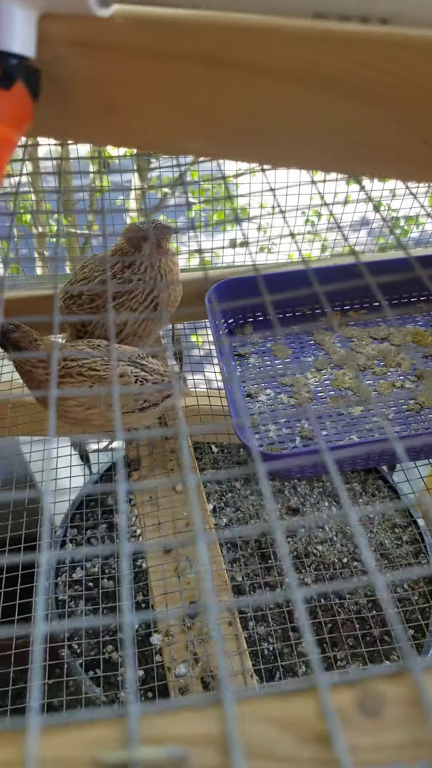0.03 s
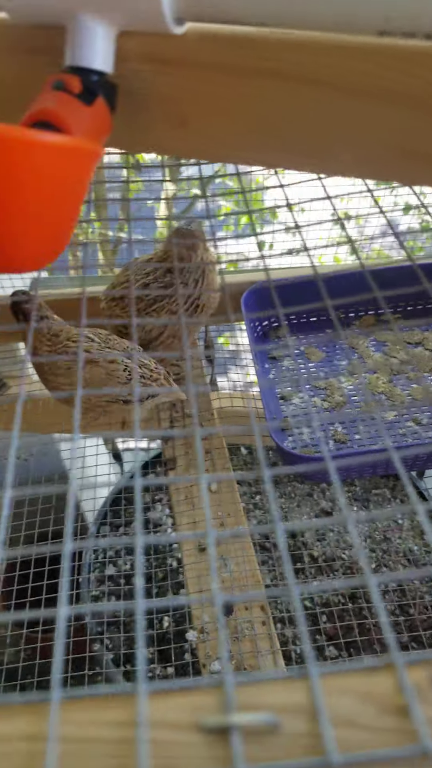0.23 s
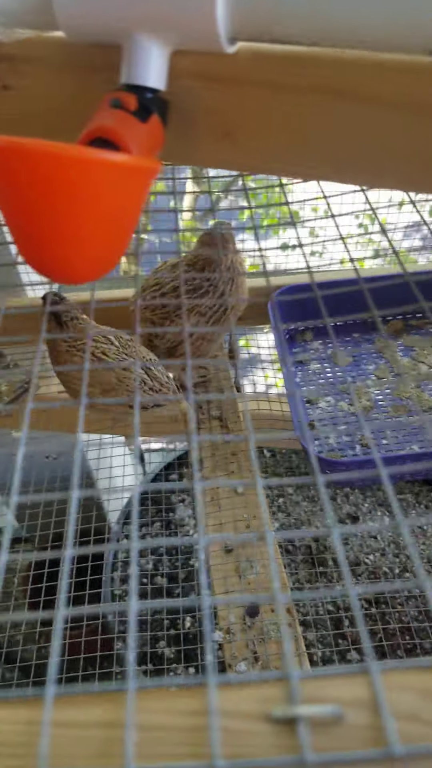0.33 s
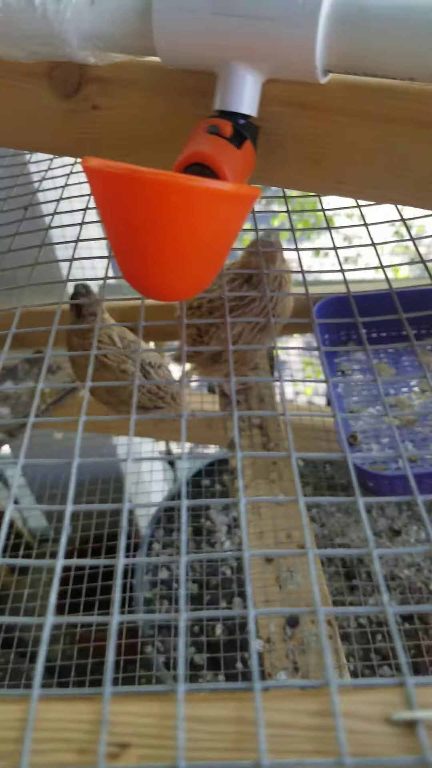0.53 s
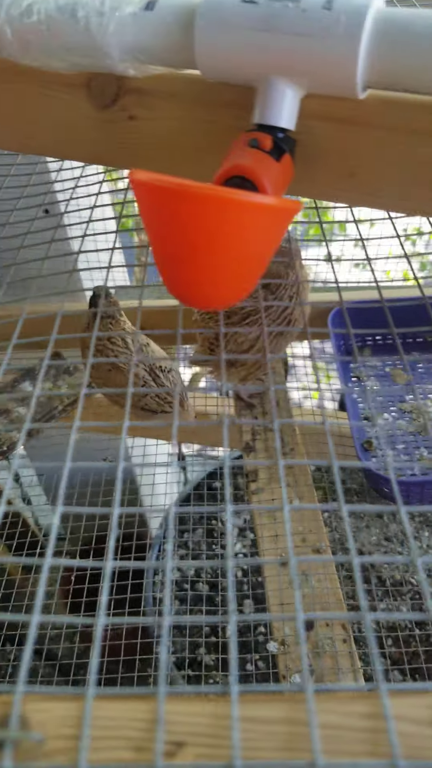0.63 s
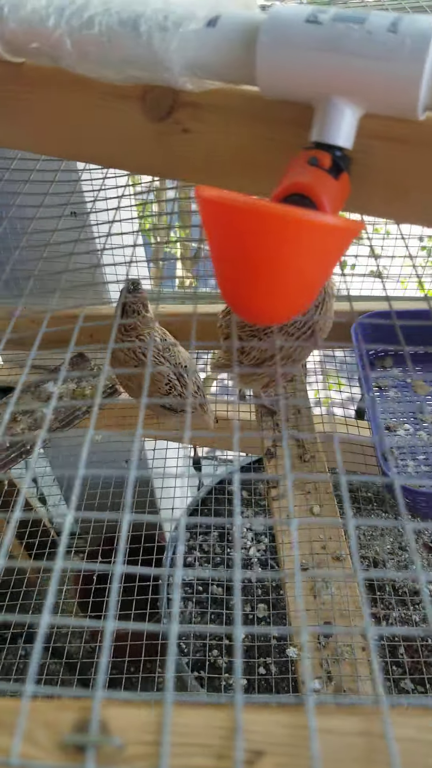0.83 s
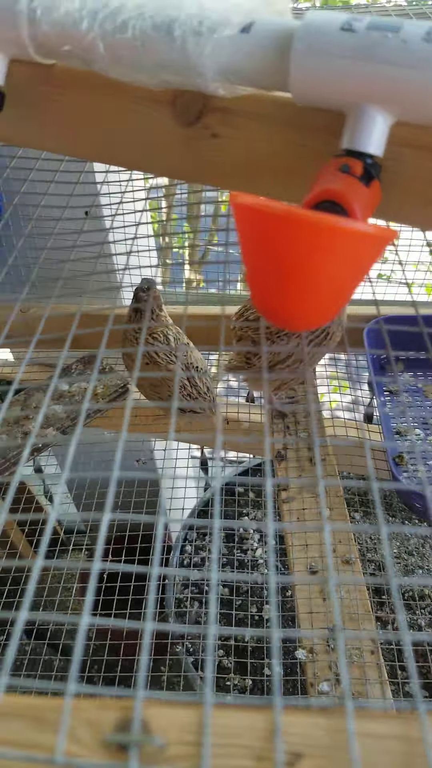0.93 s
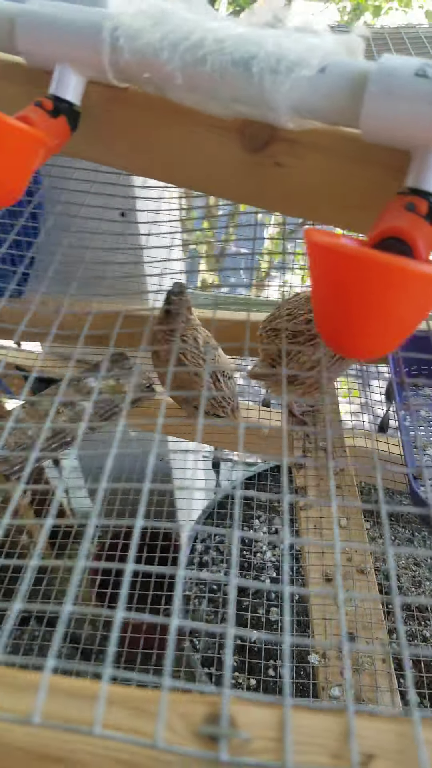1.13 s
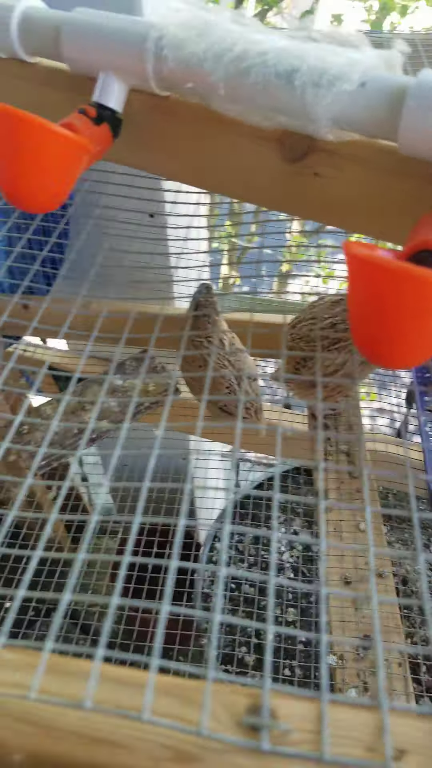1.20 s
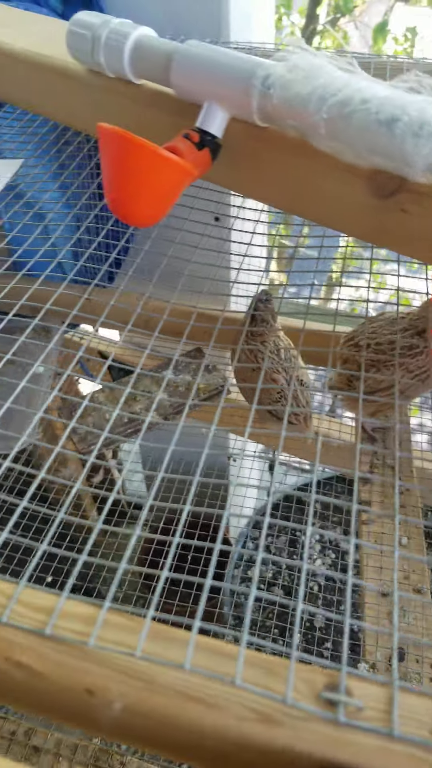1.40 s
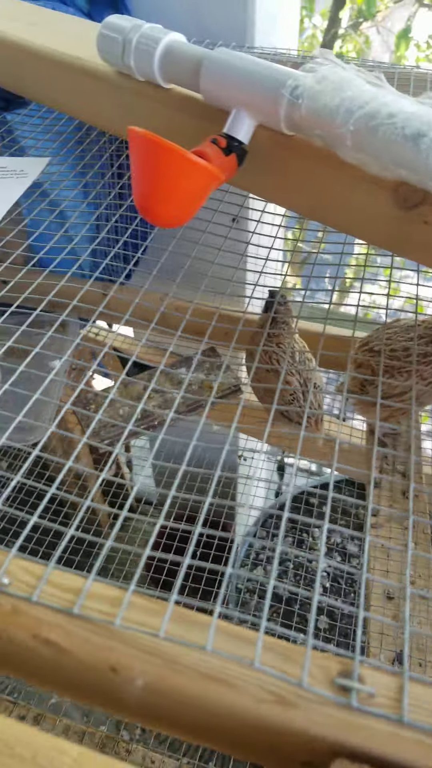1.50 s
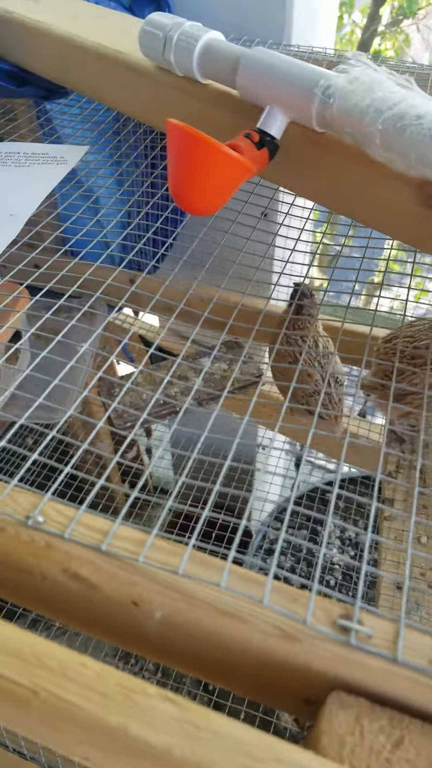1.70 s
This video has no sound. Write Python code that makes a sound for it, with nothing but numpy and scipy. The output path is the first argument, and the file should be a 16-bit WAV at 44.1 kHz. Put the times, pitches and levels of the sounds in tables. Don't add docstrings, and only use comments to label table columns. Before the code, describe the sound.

A caged quail gives one loud, harsh, raspy trilled crow very close, then faint claw ticks

```python
import sys
import numpy as np
from scipy import signal
from scipy.fft import rfft, irfft, next_fast_len
from scipy.io import wavfile
from scipy.ndimage import uniform_filter1d, minimum_filter1d, map_coordinates

SR = 44100
rng = np.random.default_rng(int(sys.argv[2]) if len(sys.argv) > 2 else 0)


def convert_level_to_amplitude(level_db):
    exponent = np.asarray(level_db, float) / 20
    return 10 ** exponent


def store_wav(level_fs):
    pcm = np.round(np.clip(np.atleast_2d(level_fs), -1, 1) * 32767)
    wavfile.write(sys.argv[1], SR, pcm.T.astype(np.int16))


N = 77175
T = np.arange(N) / SR

# [f/Hz, width/Hz, level/dB]
INSECTS = [(1550, 350, -66), (2900, 310, -57.5), (6650, 500, -61), (8600, 680, -62), (12000, 1400, -60.5)]
INSECTS_END_S, INSECTS_FADE_DB_PER_S = 0.65, 20
# [t/s, traffic level/dB, flock level/dB]
AROUND = [
    [(0.0, -42, -53.5), (0.082, -50, -60.5), (0.12, -51.5, -54)],
    [(0.62, -56.5, -61), (1.01, -59.5, -73.5), (1.75, -52.5, -57)],
]
# [f/Hz, level/dB]
TRAFFIC = [(15, -51.5), (25, -26.5), (92, 4.5), (114, -8.5), (173, -4.5), (202, -10), (491, -12.5),
           (603, -19.5), (1100, -30.5), (1430, -55.5), (2420, -120)]
# [f/Hz, level/dB]
FLOCK = [(410, -24.5), (700, -10), (1200, -8), (1600, -1.5), (2100, -10.5), (2720, -9), (3330, -12),
         (4490, -11.5), (7000, -28), (9100, -56), (15400, -120)]
FLOCK_PATCH_DB = .8
# [f/Hz, level/dB]
SHUFFLE = [(500, 2), (1000, -6), (3000, -9), (4500, 0), (5500, -6), (12000, -19)]
SHUFFLE_S, SHUFFLE_DB = 1.69, -60
# [f/Hz, level/dB]
LEAVES = [(5000, -6), (8000, -5), (13000, -6), (16000, -10)]
LEAVES_DB = -76.5
# [from t/s, to t/s, level/dB]
LULL = (0.86, 1.14, -2)
# [from t/s, to t/s, level/dB]
GUST = (1.283, 1.4, -71)
# [f/Hz, correlation]
ALIKE = [(100, .99), (300, .94), (640, .6), (1400, .2), (3000, 0)]
# [from t/s, to t/s, f/Hz, end f/Hz, level/dB]
MURMURS = [(1.002, 1.216, 1680, 1910, -73), (1.098, 1.3, 1380, 1450, -73), (1.279, 1.75, 1480, 1420, -70),
           (1.42, 1.751, 1754, 1716, -67), (1.46, 1.75, 2750, 2696, -74.5), (0.838, .96, 4830, 4730, -75)]

# [t/s, level/dB, f/Hz, L-R level/dB]
TICKS = [
    (1.0857, -43, 11820, -22),
    (1.1095, -42, 12000, -17),
    (1.1681, -56, 15340, -9.5),
    (1.1772, -57, 12000, -13),
    (1.2142, -45, 10200, -14.5),
]
# [t/s, level/dB, f/Hz, L-R level/dB]
TAPS = [
    (1.2444, -62, 1648, -2),
    (1.286, -55, 1487, 1),
    (1.3531, -51, 1846, -8.5),
    (1.4778, -53.5, 2686, 1),
    (1.5959, -48, 1477, 1.5),
]
TOUCH_S = .0001

# [peak t/s, level/dB, swell/s, f/Hz]
WHISTLES = [(0.134, -11, .003, 1826), (0.141, -6.5, 0.0071, 1840), (0.15, -1, 0.0022, 1863),
            (.180, -2, 0.0031, 1830), (0.2152, -6.5, 0.0051, 1964), (0.2253, -1, 0.0034, 1840),
            (0.2726, 0, .004, 1850), (0.3152, -4, 0.0058, 1874), (0.3229, -1, 0.0028, 1879),
            (.365, -14, 0.0066, 1980), (0.371, -2, 0.0053, 1843), (0.3782, -3.5, 0.00082, 1996),
            (0.409, -11, 0.004, 1797), (0.418, -7.5, 0.0031, 1870), (.425, -1.5, 0.007, 1904),
            (.438, -16, .004, 1997), (0.444, -15, 0.00067, 1934), (0.468, -17, 0.0041, 1860)]
START_S, START_HZ, START_GLIDE_S, END_S = .131, 1186, .019, 0.595
ONSET_S, FADE_SHARE, DROOP_HZ = .0025, 0.31, 106

# [break t/s, length/s, level/dB, top of arch f/Hz]
RASPS = [
    (.153, 0.02, -13, 3714),
    (.197, 0.014, -11.5, 4053),
    (.240, 0.025, -12, 3848),
    (.286, .027, -15, 4110),
    (.333, .031, -17.5, 3710),
    (.380, .033, -20, 3475),
    (.428, 0.042, -21, 3280),
    (.479, 0.086, -22, 3100),
]
SLIDE_S, SLIDE_DB, SLIDE_HZ = 0.0011, 3.8, 2377
ARCH_SHARE, ARCH_DB, HOLD_DB = .74, -10, -21.5
RASP_RISE_S, RASP_FALL_S, RASP_SAG_DB, LAST_SAG_DB = 0.0015, 0.003, 3, 17
STEADY, FLUTTER_HZ, SCATTER_HZ = .35, 36.9, 254.4
OCTAVE_DB, FIFTH_HZ, FIFTH_DB = -38, 5397, -19
UNDER_HZ, UNDER_SINKS_HZ, UNDER_DB, UNDER_LEAD_S = 1394, 1197, -18, 0.0033
LUMP_DB, SUNK_SHARE = 3.5, .12

# [t/s, half length/s, level/dB, f/Hz, glide/(Hz per ms)]
SQUEAKS = [(.140, 0.0065, -30.5, 928, 7.5), (.158, 0.0011, -5, 3600, 0.5),
           (.166, 0.0057, -14.5, 3154, -14.5), (.1975, 0.0017, -10.5, 2423, 20.5),
           (.203, 0.0093, -19.5, 2750, 10.5), (.205, 0.0026, -14, 4068, 0), (.219, 0.0023, -26.5, 3896, -9),
           (.240, 0.0012, -12, 2516, 22.5), (.243, 0.0015, -12.5, 2935, 19.5),
           (.249, 0.0036, -23.5, 2490, -38.5), (.249, .004, -23, 4188, -4.5),
           (.259, .004, -10.5, 3200, -60), (.265, 0.0016, -23.5, 3256, -27.5), (.287, .002, -14, 2400, 31),
           (.293, .004, -17, 4103, 1.5), (.298, .004, -23, 2450, 4.5), (.308, 0.0041, -15, 3064, 79),
           (.334, 0.0029, -12.5, 2298, 35.5), (.345, 0.005, -23, 4038, -1), (.354, 0.0035, -14, 3085, -63),
           (.381, 0.0015, -13.5, 2306, 50), (.386, 0.0014, -19.5, 3570, 19),
           (.401, 0.013, -24, 3232, -31.5), (.430, 0.0029, -20.5, 2328, 47.5),
           (.450, .0015, -22.5, 2246, -5.5), (.466, 0.006, -18.5, 2407, 7), (.483, 0.0016, -12.5, 2710, 17),
           (.483, .002, -32, 4730, -6.5),
           (.159, 0.0013, -19, 1830, 6), (.164, .0015, -17, 1880, 7), (.171, .002, -17.5, 1750, -10.5),
         (.191, 0.0024, -20, 1470, -20), (.192, 0.0023, -22, 1910, 3), (.206, .002, -18, 1810, 1),
         (.235, .003, -24.5, 1400, -5.5), (.247, 0.0012, -20.5, 1861, -30), (0.257, 0.0018, -18, 1791, -54),
         (0.264, .0015, -19, 1827, -31), (.341, .002, -21.5, 1950, 5.5), (.357, 0.0058, -17, 1520, 2),
         (.391, .003, -20.5, 1940, 4.5), (0.546, 0.01, -37.5, 1194, -2.5)]
SQUEAK_LIFT_DB, SQUEAK_OCTAVE_DB = 2, -28

# [f/Hz, level/dB]
THROAT = [(700, -34), (1830, 1), (2750, -7.5), (3300, -13), (4050, -14), (7000, -28.5), (9000, -33.5),
          (15700, -32.5)]
# [f/Hz, level/dB]
SLACK = [(290, -67.5), (500, -33.5), (1190, -2), (2080, -5), (3170, -2.5), (6800, -29), (9080, -45.5),
         (10600, -33), (15700, -36.5)]
LEAK_DB, PULSE_HZ, PULSE_DB, APART_HZ = -11, 1580, 2, 6000

# [delay t/s, left level/dB, right level/dB]
WALLS = [(.0006, -18.5, -20.5), (.0013, -6, -4.5), (.0024, -13, -20), (.0041, -10, -10.5),
         (.0068, -14.5, -8.5), (0.012, -12.5, -8.5)]
# [f/Hz, T60/s]
MESH_T60 = [(1000, 0.0057)]
# [f/Hz, level/dB]
MESH_DB = [(1500, -4), (9000, -4.5)]
# [f/Hz, T60/s]
YARD_T60 = [(500, 0.55), (2000, 1), (4000, .8), (12000, .5)]
YARD_DB, BIRD_DB = -33.5, -3.2
# [f/Hz, L-R level/dB]
LEFT_OVER = [(700, 7.5), (1400, -1.5), (1900, 0.07), (2400, 1), (3300, 5.5), (4500, 9.5), (9000, -4.5),
             (13000, -5)]
LEFT_LAG_S = -.00009
# [f/Hz, width/Hz, level/dB]
PORT = [
    (12200, 890, 2.5),
    (7660, 320, -6.5),
    (9980, 1600, -5.5),
]
TOP_HZ, CEILING, LOOK_S = 15780, 1.005, .002


def unit(x):
    return x / np.sqrt(np.mean(x ** 2) + 1e-20)


def along(points, hz):
    f, v = np.transpose(points)
    return np.interp(np.log(hz + 1), np.log(f + 1), v)


def closed(points, hz):
    octaves_out = np.log2(np.maximum((hz + 1) / points[-1][0], points[0][0] / (hz + 1)).clip(1))
    return convert_level_to_amplitude(along(points, hz) - 27 * octaves_out)


def wobble(rate):
    return map_coordinates(rng.standard_normal(int(N * rate / SR) + 4), [T * rate])


def step(s, width):
    return .5 + .5 * np.tanh((T - s) / width)


def bump(s, before, after):
    return np.exp(-.5 * ((T - s) / np.where(T < s, before, after)) ** 2)


def sine(hz):
    return np.sin(2 * np.pi * np.cumsum(hz) / SR)


def filtered(x, response):
    m = next_fast_len(N + 8192)
    return irfft(rfft(x, m) * response(np.fft.rfftfreq(m, 1 / SR)), m)[..., :N]


def tail(x, t60, wait):
    hz, t, z = signal.stft(rng.standard_normal((2, SR)), SR, nperseg=128)
    wash = signal.istft(z * convert_level_to_amplitude(-60 * t / along(t60, hz)[:, None]), SR, nperseg=128)[1]
    late = np.pad(x, ((0, 0), (round(wait * SR), 0)))
    return signal.fftconvolve(late, wash / np.linalg.norm(wash[0]), axes=1)[:, :N]


def rush(spectrum, patchy_db):
    z = signal.stft(rng.standard_normal((2, N)), nperseg=512)[2]
    field = uniform_filter1d(rng.standard_normal(z.shape[1:]), size=4, axis=0)
    field = uniform_filter1d(field, size=10, axis=1)
    pair = signal.istft(z * convert_level_to_amplitude(patchy_db * unit(field)), nperseg=512)[1][:, :N]

    def response(hz):
        turn = np.arccos(np.clip(along(ALIKE, hz), -1, 1)) / 2
        return closed(spectrum, hz) * np.array([np.cos(turn), np.sin(turn)])

    mid, side = filtered(pair, response)
    return np.array([mid + side, mid - side]) / np.std(mid)


def insects():
    def bands(f):
        return sum(convert_level_to_amplitude(d) * np.exp(-((f - hz) / w) ** 2) * np.sqrt(SR / w / 1.2) for hz, w, d in INSECTS)

    fade = convert_level_to_amplitude(-INSECTS_FADE_DB_PER_S * T) * (1 - step(INSECTS_END_S, 0.097))
    return fade * filtered(rng.standard_normal((2, N)), bands)


def traffic_and_flock():
    s, *db = np.transpose(AROUND[0] + AROUND[1])
    hum, flock = [convert_level_to_amplitude(np.interp(T, s, d)) for d in db]
    shuffle = convert_level_to_amplitude(SHUFFLE_DB) * step(SHUFFLE_S, .015) * rush(SHUFFLE, patchy_db=1.5)
    traffic = hum * rush(TRAFFIC, patchy_db=-2.16)
    rustle = flock * convert_level_to_amplitude(1.7 * wobble(39)) * rush(FLOCK, patchy_db=FLOCK_PATCH_DB)
    return traffic + rustle + shuffle


def leaves():
    start, end, db = LULL
    lull_db = db * step(start, .04) * (0.5 - step(end, .02))
    start, end, db = GUST
    gust = convert_level_to_amplitude(db) * step(start, 0.045) * (1 - step(end, 0.014))
    return (convert_level_to_amplitude(LEAVES_DB + lull_db) + gust) * rush(LEAVES, patchy_db=2.16)


def murmurs():
    out = np.zeros((2, N))
    for port in out:
        for start, end, hz, end_hz, db in MURMURS:
            level = convert_level_to_amplitude(db + 4.2 * wobble(45.05)) * step(start, .015) * (1 - step(end, .015))
            port += level * sine(np.interp(T, [start, end], [hz, end_hz]) + 45 * wobble(78))
    return out


def feet(rows, t60, spread, gain_db):
    out, t = np.zeros((2, N + 2000)), np.arange(2000) / SR
    envelope = convert_level_to_amplitude(-60 * t / t60) * (1 - np.exp(-t / TOUCH_S))
    for s, db, hz, pan_db in rows:
        modes = np.clip(hz * np.exp(spread * rng.standard_normal((2, 9, 1))), 0, 15300)
        ring = np.sin(2 * np.pi * modes * t).sum(1) * envelope
        out[:, round(s * SR):][:, :2000] += convert_level_to_amplitude(db + gain_db + pan_db * np.array([[.5], [-.5]])) * ring
    return out[:, :N]


def throat_air(slack):
    pulses = (rng.random(N) < PULSE_HZ / SR) * convert_level_to_amplitude(PULSE_DB * rng.standard_normal(N))
    air = unit(pulses - pulses.mean()) + 0.27 * rng.standard_normal(N)
    air = air + 1.5 * filtered(rng.standard_normal((2, N)), lambda f: 1 / (1 + (APART_HZ / (f + 1)) ** 6))
    tense, loose = [unit(filtered(air, lambda f: closed(shape, f))) for shape in (THROAT, SLACK)]
    return (1 - slack) * tense + slack * loose


def squeaks_and_blips():
    out = np.zeros(N)
    for c, w, db, hz, glide in SQUEAKS:
        path = hz + np.clip(1000 * glide * (T - c), -600, 600) + 25 * wobble(250)
        level = convert_level_to_amplitude(db + SQUEAK_LIFT_DB + 0.65 * wobble(250)) * bump(c, w, w)
        out += level * (sine(path) + convert_level_to_amplitude(SQUEAK_OCTAVE_DB) * sine(2 * path))
    return out


def whistles():
    s, _, _, hz = np.transpose(WHISTLES)
    start_glide = np.clip(1 - (T - START_S) / START_GLIDE_S, 0, 1)
    rest = np.interp(T, s, hz) - (hz[0] - START_HZ) * start_glide
    clean = sum(convert_level_to_amplitude(d) * bump(c, w, FADE_SHARE * w) for c, d, w, _ in WHISTLES)
    droop = sum(-DROOP_HZ * (T - c) / w * bump(c, w, w) for c, d, w, _ in WHISTLES[3:])
    return rest, clean, droop


def breaks(rest):
    arch, rasp, slide, dip = np.zeros((4, N))
    for k, (c, length, db, top_hz) in enumerate(RASPS):
        u = np.clip((T - c) / length, 0, 1)
        up = (SLIDE_HZ - rest) * step(c - .0015, SLIDE_S) + (top_hz - SLIDE_HZ) * step(c + .006, .002)
        arch += up * (1 - np.minimum(u / ARCH_SHARE, 1) ** 2.9)
        gate = step(c + 0.0019, RASP_RISE_S) * (1 - step(c + length, RASP_FALL_S))
        sag_db = LAST_SAG_DB if k == len(RASPS) - 1 else RASP_SAG_DB
        rasp += convert_level_to_amplitude(db - sag_db * u) * gate
        slide += convert_level_to_amplitude(db + SLIDE_DB) * bump(c, 0.004, 0.0013)
        if k > 0:
            dip += convert_level_to_amplitude(db) * bump(c - UNDER_LEAD_S, 0.0036, 0.0049)
    return arch, rasp, slide, dip


def quail():
    rest, clean, droop = whistles()
    arch, rasp, slide, dip = breaks(rest)
    effort = np.interp(T, [r[0] for r in RASPS] + [END_S], [convert_level_to_amplitude(r[2]) for r in RASPS] + [convert_level_to_amplitude(-39.5)])
    ragged, slack = np.clip(rasp / effort, 0, 1), step(.47, 0.036)
    tense_rasp = rasp * (1 - slack)

    pitch = rest + droop + arch + STEADY * FLUTTER_HZ * wobble(160) + SCATTER_HZ * ragged * wobble(700)
    level = clean + slide + convert_level_to_amplitude(ARCH_DB) * tense_rasp * convert_level_to_amplitude(6.3 * wobble(300))
    tone = level * (sine(pitch) + convert_level_to_amplitude(OCTAVE_DB) * sine(2 * pitch))
    tone += convert_level_to_amplitude(HOLD_DB + 9.5 + LUMP_DB * wobble(220)) * tense_rasp * sine(rest + 120 * wobble(260))

    under_hz = UNDER_HZ + (UNDER_SINKS_HZ - UNDER_HZ) * slack + 60 * wobble(200)
    under = dip + SUNK_SHARE * slack * effort + .3 * rasp
    tone += convert_level_to_amplitude(UNDER_DB + 14.0 + LUMP_DB * wobble(150)) * under * sine(under_hz)
    tone += squeaks_and_blips()
    tone += convert_level_to_amplitude(FIFTH_DB + 2.3 * wobble(180)) * rasp * sine(FIFTH_HZ + 300 * wobble(120))

    breath = rasp + convert_level_to_amplitude(LEAK_DB) * effort * step(.145, .008)
    on = step(START_S + ONSET_S, ONSET_S) * (1 - step(END_S, 0.011))
    return on * (tone + breath * throat_air(slack))


def cage(x):
    side = np.array([[1], [-1]])
    s, *db = np.transpose(WALLS)

    def planks(f):
        echo = 1 + convert_level_to_amplitude(np.array(db)) @ np.exp(-2j * np.pi * np.outer(s, f)) * side
        return np.exp(-1j * np.pi * f * side * LEFT_LAG_S) * echo

    near = filtered(x, planks)
    near = near + filtered(tail(x, MESH_T60, 0.001004), lambda f: convert_level_to_amplitude(along(MESH_DB, f)))
    shaded = filtered(near, lambda f: convert_level_to_amplitude(side * along(LEFT_OVER, f) / 2))
    return shaded + convert_level_to_amplitude(YARD_DB) * tail(x, YARD_T60, 0.016)


def limited(x):
    span = round(LOOK_S * SR)
    need = CEILING / np.maximum(np.abs(x).max(0), CEILING)
    gain = uniform_filter1d(minimum_filter1d(need, size=2 * span), size=span)
    return np.clip(x * gain, -1, 1)


def scene():
    bird = cage(convert_level_to_amplitude(BIRD_DB) * quail())
    claws = feet(TICKS, 0.0047, 0.18, -6.5) + feet(TAPS, 0.013, 0.095, -16.5)
    background = insects() + traffic_and_flock() + leaves() + murmurs()
    return bird + claws + background


def roll_off(x):
    return signal.sosfilt(signal.butter(12, 16480, fs=SR, output="sos"), x)


def record(dry):
    def ports(f):
        bumps_db = sum(db * np.exp(-((f - hz) / w) ** 2) for hz, w, db in PORT)
        return convert_level_to_amplitude(bumps_db) * np.clip((TOP_HZ - f) / 150, 0, 1)

    mix = limited(filtered(dry, ports))
    return roll_off(mix)


dry = scene()
out = record(dry)
store_wav(out)
```